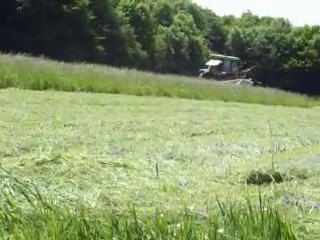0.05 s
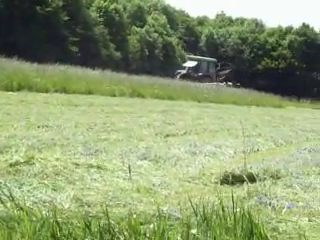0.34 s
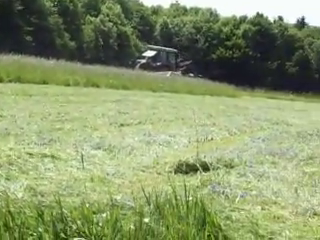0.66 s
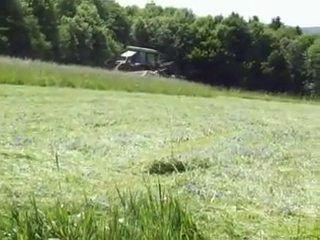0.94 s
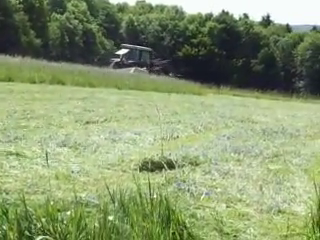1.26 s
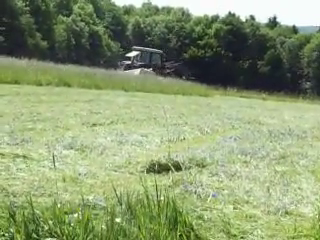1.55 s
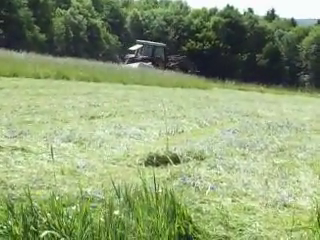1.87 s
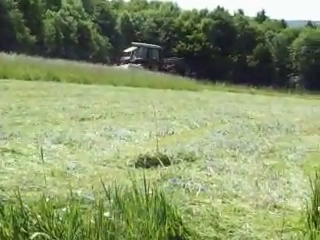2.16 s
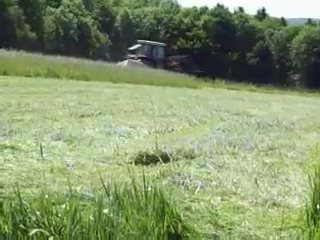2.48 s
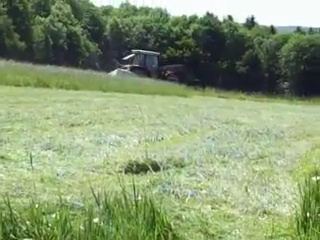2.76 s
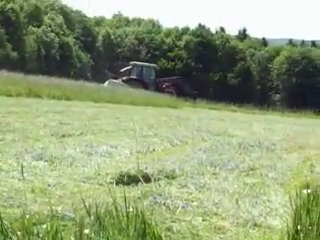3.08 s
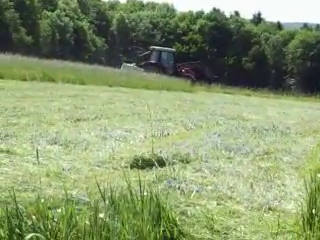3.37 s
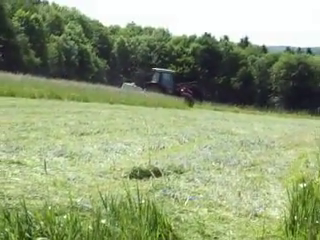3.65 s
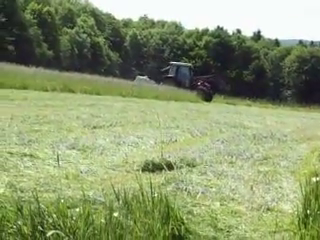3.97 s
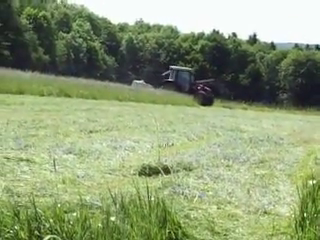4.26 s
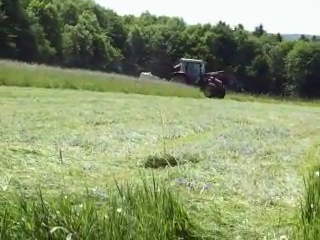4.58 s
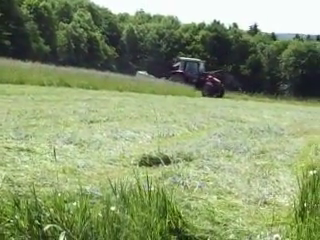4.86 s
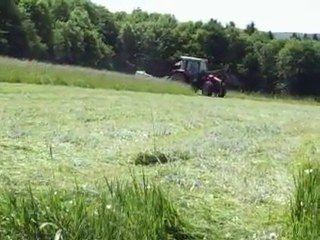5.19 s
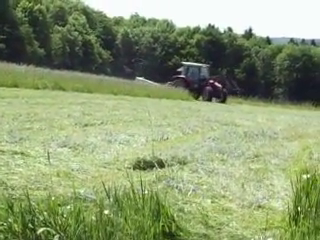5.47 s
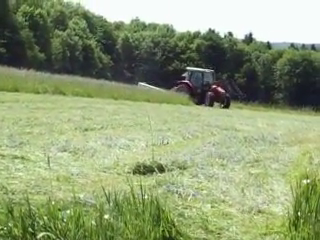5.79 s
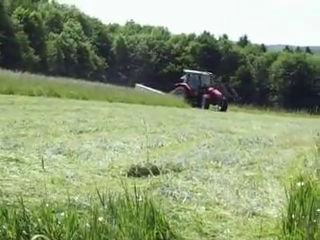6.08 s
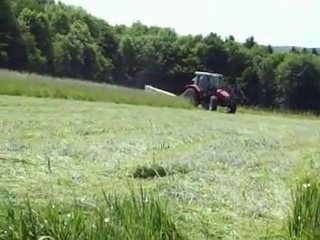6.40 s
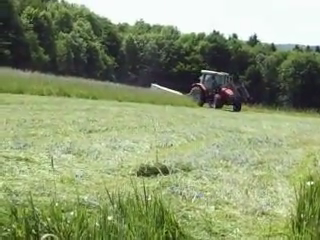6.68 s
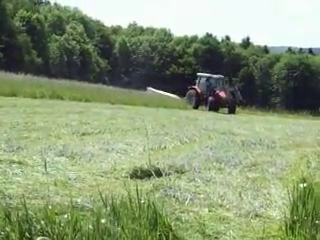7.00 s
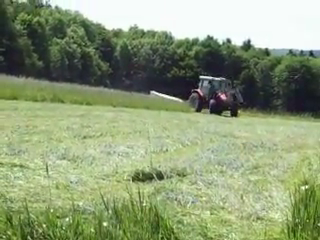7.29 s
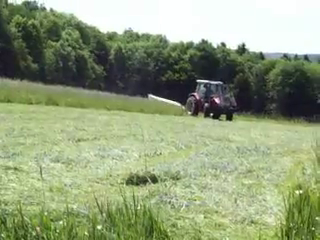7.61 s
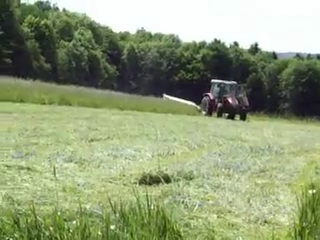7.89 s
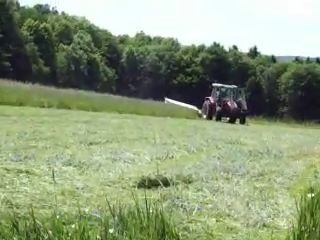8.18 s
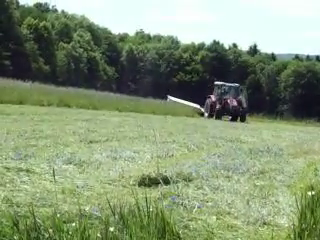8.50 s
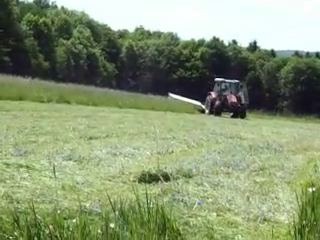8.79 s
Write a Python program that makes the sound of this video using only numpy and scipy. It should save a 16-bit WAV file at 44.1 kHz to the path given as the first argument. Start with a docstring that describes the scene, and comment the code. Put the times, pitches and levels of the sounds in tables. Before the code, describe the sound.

A distant tractor drones across an open field for the whole nine seconds, a low, throbbing engine rumble mixed with a mower's rattle and grassy hiss. The engine pitch sags slightly around 1 second and slowly recovers. Two crickets chirp high and fast throughout, the nearer in bouts, the fainter without pause. A brief, soft scuff sounds close by at 1.2 seconds, and a faint bird note at 1.5. Sharp ticks hit the microphone at 2.7 and 3.4 seconds, the second the loudest, with a smaller one just after. From about 4 seconds the exhaust tone and blade hum strengthen, the hum clearest from 6.7 on. Between 5.4 and 8.4 seconds a small bird gives scattered short, thin whistles, with faint dry crackles nearby. Light ticks fall at about 5.9, 6.3 and 6.9 seconds. The drone continues to the end.

```python
"""Mowing a hay meadow

A distant tractor pulls a mower: periodic firing gives the exhaust drone, rotating blades a hum,
and sheared grass a broadband hiss. Two crickets stridulate close by and a small bird whistles.
A scuff, faint crackles and a few sharp ticks sound at the microphone; the loudest tick makes
the gain control duck."""
import sys
import numpy as np
from scipy import signal
from scipy.fft import rfft, irfft, next_fast_len
from scipy.io import wavfile
from scipy.ndimage import uniform_filter1d, map_coordinates

SR = 44100
rng = np.random.default_rng(int(sys.argv[2]) if len(sys.argv) > 2 else 0)


def store_wav(level_fs):
    """Save 16-bit WAV to argv[1]."""
    pcm = np.round(np.clip(np.atleast_2d(level_fs), -1, 1) * 32767)
    wavfile.write(sys.argv[1], SR, pcm.T.astype(np.int16))


N = 390285
TIME = np.arange(N) / SR

# firing rate, which sags in thick grass and slowly recovers: t/s, f/Hz
FIRING_RATE = [(0, 76.9), (.38, 78.2), (.8, 73), (1.05, 74.8), (1.85, 73.53), (3, 73.84), (4.35, 76.1),
               (5.45, 76.7), (6.25, 77.5), (6.7, 76.88), (7.1, 78.2), (7.7, 77), (8.2, 77.75),
               (8.85, 78.15)]
# exhaust fundamental, growing as the tractor clears the rise: t/s, level/dB
EXHAUST_FIRST = [(0, -49.5), (1.7, -50.5), (3.1, -56), (4.4, -46.5), (6.5, -41), (7.3, -41.5), (8.2, -47),
                 (8.85, -44.5)]
# two strong exhaust harmonics that swell and fade as the tractor moves: t/s, relative level/dB
EXHAUST_SECOND = [(0.0, -27.5), (0.34, -23.5), (0.74, -33.5), (1.01, -29), (2.17, -35), (2.69, -31),
                  (3.6, -47.5), (3.67, -42), (4.8, -30), (5.99, -43), (6.36, -29), (8.4, -30.5),
                  (8.73, -24.5), (8.85, -25.5)]
EXHAUST_FOURTH = [(0.0, -32), (0.37, -39.5), (0.57, -30.5), (4.46, -30.5), (5.49, -36), (5.79, -47.5),
                  (6.43, -33.5), (6.73, -47.5), (6.9, -33.5), (7.49, -28), (8.83, -23.5), (8.85, -25)]
# engine body throb: crank order, level at cruise/dB, slope with firing rate/(dB/Hz)
BODY_ORDERS = [(2, -41, 1.5), (4, -46, 2.2)]
# faint mower whine, locked to the crank: crank order, relative level/dB
WHINE_ORDERS = [(2.5, -55), (5.5, -49), (7, -48), (15, -55), (18, -58), (24, -57), (33, -54), (39, -54),
                (42, -56), (45, -51), (48, -51), (54, -55), (66, -57)]
# how hard the mower works in the grass: t/s, relative level/dB
MOWER_LOAD = [(0.0, -36.5), (0.22, -35.5), (0.69, -39), (1.18, -36.5), (1.55, -37.5), (1.85, -36),
              (3.15, -35.5), (3.38, -36), (4.04, -36), (5.89, -35.5), (7.42, -36), (8.85, -36.5)]
# blade hum, coming through as the mower clears the tall grass: t/s, level/dB
HUM_LEVEL = [(0, -46.5), (3.7, -46), (4.2, -38), (5.4, -37.5), (5.8, -44.5), (6.7, -31.5), (8.85, -33.5)]
# noise spectra: f/Hz, relative spectral density/dB
RUMBLE_SPECTRUM = [(20, -25.5), (45, -17.5), (90, -10.5), (125, -3.5), (175, -0.5), (250, -3), (330, -9.5),
                   (430, -15), (520, -23.5), (900, -58.5)]
CLATTER_SPECTRUM = [(250, -34), (400, -9), (510, -10), (630, -2), (740, -1.5), (810, 2.5), (900, -1),
                    (1250, -5.5), (1420, -5), (1540, -12), (2200, -28.5)]
CUTTING_SPECTRUM = [(900, -34), (1450, -7.5), (1700, -2), (1930, 1), (2130, -2), (2230, -5), (2420, -2.5),
                    (2650, -12.5), (3500, -32)]
HISS_SPECTRUM = [(1800, -27), (2650, -7.5), (2850, -1), (3100, -2), (3350, 2.5), (3600, -1), (3950, 2.5),
                 (4450, 0.6), (5200, -6.5), (5700, -9)]
CRACKLE_SPECTRUM = [(1500, -22), (2800, -2.5), (3600, -1.5), (4400, -4), (5500, -16.5)]
SCUFF_SPECTRUM = [(800, -20), (1400, 2.5), (2200, 0), (2800, -12), (4400, -5), (5500, -29)]
# song bouts of the near cricket: first chirp t/s, last chirp t/s, relative level/dB
CRICKET_BOUTS = [(0.036, 0.397, -35), (0.808, 2.685, -34.5), (3.038, 3.199, -39), (3.539, 4.255, -39),
                 (4.629, 5.124, -34.5), (5.585, 7.739, -35), (8.095, 8.728, -35.5)]
# bird notes: t/s, duration/s, start f/Hz, middle f/Hz, end f/Hz, relative level/dB
BIRD_NOTES = [(1.53, 0.089, 2516, 2448, 2402, -40), (5.387, 0.098, 3720, 3606, 3540, -34),
              (5.727, 0.087, 3020, 2950, 2860, -38.5), (6.041, 0.1, 3285, 3833, 3930, -29.5),
              (6.464, .07, 2750, 2615, 2740, -42), (6.634, 0.085, 4200, 3960, 3350, -30),
              (7.42, 0.039, 3600, 3680, 4120, -36), (7.75, 0.033, 2820, 2875, 2980, -39.5),
              (8.409, 0.025, 3530, 3700, 3695, -38)]
# taps on the microphone's casing: t/s, relative level/dB, T60/s, brightest f/Hz, low bump level/dB
TAPS = [(2.6688, -10.5, .01, 4300, -29), (3.3601, -4.5, .0075, 3200, -18), (3.517, -14.5, .008, 2200, -60),
        (5.89, -25, .008, 4000, -70), (6.271, -23, .008, 3800, -70), (6.936, -19, .008, 2600, -70)]
# modes of the casing: f/Hz, relative level/dB, T60 as a fraction of the tap's
CASING_MODES = [(1420, 1, 0.44), (2750, 1, 0.17), (3680, 0, 0.55), (4000, -7, 0.64), (4480, -0.5, 0.71)]


def engine(crank):
    """Periodic excitation: exhaust harmonics, over a throb and rumble that grow with speed."""
    firing = 3 * crank  # six cylinders fire three times a turn
    over_hz = curve(FIRING_RATE) - 77  # firing rate above cruise
    third_db = -36.5 - 10 * ramp(7.5, 9.4)  # fades as the tractor turns to face the listener
    levels = [curve(EXHAUST_FIRST), curve(EXHAUST_SECOND) - .5, third_db, curve(EXHAUST_FOURTH) - .2]
    exhaust = sum(amp(db) * tone(k * firing, flutter_db=1, drift_rad=.05)
                  for k, db in enumerate(levels, 1))
    throb = sum(amp(db + slope * over_hz) * tone(k * crank, flutter_db=1, drift_rad=.05)
                for k, db, slope in BODY_ORDERS)
    # the higher a tone, the more the moving air smears it
    whine = sum(amp(db - 2) * tone(k * crank, flutter_db=3.5 + .04 * k, drift_rad=.009 * k)
                for k, db in WHINE_ORDERS)
    rumble = amp(-35 + .53 * over_hz) * rush(RUMBLE_SPECTRUM, patchy_db=1.3)
    return exhaust + throb + whine + rumble


def mower(crank):
    """Fixed gear ratios lock the tones to the crank; rattle and shearing noise grow with load."""
    blades, drive, gears = 8.35 * crank, 18.5 * crank, 76.5 * crank
    load_db = curve(MOWER_LOAD) - curve(MOWER_LOAD).mean()
    load_db += .51 * wobble(14)  # uneven grass jolts the whole bar at once
    cutting_db = -42 + .98 * load_db - 2.5 * ramp(5.6, 7.8)  # the turning tractor hides the mower
    fundamental = tone(blades, flutter_db=.6, drift_rad=.1)
    octave = amp(-19.5) * tone(2 * blades, flutter_db=1.5, drift_rad=.3)
    hum = amp(curve(HUM_LEVEL)) * (fundamental + octave)
    gearing = amp(-55.5) * tone(drive, flutter_db=4, drift_rad=.22)
    gearing += amp(cutting_db - 13.5) * tone(gears, flutter_db=3.5, drift_rad=1.5)
    clatter = amp(-37.5 + .8 * load_db) * rush(CLATTER_SPECTRUM, patchy_db=1.47)
    cutting = amp(cutting_db) * rush(CUTTING_SPECTRUM, patchy_db=1.65)
    hiss = amp(-37.5 + 1.6 * load_db) * rush(HISS_SPECTRUM, patchy_db=1.35)
    return hum + gearing + clatter + cutting + hiss


def crickets():
    """Pulse trains: a near cricket sings in bouts, a fainter, higher one without rests."""
    near_chirps = [(s, db) for first, last, db in CRICKET_BOUTS for s in bout(first, last)]
    far_chirps = [(s + rng.normal(0, .03), -42) for s in np.arange(0, N / SR, .203)]
    near = cricket(near_chirps, strokes=2, spacing_s=.0305, length_s=.021, pitch_hz=4852, sag=.045)
    far = cricket(far_chirps, strokes=3, spacing_s=.031, length_s=.022, pitch_hz=4993, sag=.029)
    return amp(.15) * scattered(near, t60=.047, wet_db=-11.5) + far


def cricket(chirps, strokes, spacing_s, length_s, pitch_hz, sag):
    """Stridulation: each wing stroke scrapes a toothed file, and the pitch sags as the wing slows."""
    track = np.zeros(N)
    for s, db in chirps:
        for stroke in range(strokes):
            late, sharp, loud, bend = rng.standard_normal(4)
            slowing = sag * np.exp(.43 * bend)
            glide = pitch_hz * (1 + .0068 * sharp) * np.array([1 + slowing / 3, 1, 1 - slowing])
            onset = s + stroke * spacing_s + .00078 * late - length_s / 2
            add(track, onset, amp(db + loud) * whistle(length_s, glide))
    return track * (1 + .3 * wobble(400))  # the teeth catch unevenly


def bout(first, last, nominal_period_s=.176, hurry=.25, settle_chirps=1.5):
    """Exponential relaxation: chirp times start hurried and settle to an even pace."""
    k = np.arange(round((last - first) / nominal_period_s) + 1)
    paced = k - hurry * settle_chirps * (1 - np.exp(-k / settle_chirps))
    return first + (last - first) * paced / paced[-1]


def bird():
    """Frequency modulation: thin slurred notes from the edge of the wood."""
    track = np.zeros(N)
    for s, length_s, *pitches, db in BIRD_NOTES:
        add(track, s, amp(db - 5) * whistle(length_s, pitches))
    return scattered(track * (1 + .3 * wobble(200)), t60=.15, wet_db=-3)


def ticks():
    """Impact excitation: hard taps ring the casing's damped modes and push the microphone off centre."""
    track, t = np.zeros(N), np.arange(SR // 2) / SR
    for s, db, t60, centre_hz, bump_db in TAPS:
        ring = np.zeros(len(t))
        for hz, level, life in CASING_MODES:
            mode_db = level + rng.normal(0, 1) - 5.9 * np.log2(hz / centre_hz) ** 2
            ring += amp(mode_db - 60 * t / (t60 * life)) * np.sin(2 * np.pi * hz * t)
        crack = .15 * amp(-60 * t / t60) * rng.standard_normal(len(t))
        bump = amp(bump_db) * (1 - np.exp(-t / .001)) * np.exp(-t / .07)
        add(track, s, amp(db) * (crack - ring) - bump)
    return track


def scuff():
    """Friction noise: one brief scuff close by, under a Gaussian envelope."""
    swell = amp(-30.5) * np.exp(-((TIME - 1.177) / .016) ** 2)
    return swell * rush(SCUFF_SPECTRUM, patchy_db=1.5)


def crackles(first_s=5.6, last_s=8.5, per_second=6, t60=.03):
    """Exponentially decaying noise bursts at random moments make faint dry rustles nearby."""
    envelope, t = np.zeros(N), np.arange(SR // 10) / SR
    for _ in range(round((last_s - first_s) * per_second)):
        add(envelope, rng.uniform(first_s, last_s), amp(-35 + rng.normal(0, 2) - 60 * t / t60))
    return envelope * rush(CRACKLE_SPECTRUM, patchy_db=3.5)


def scattered(x, t60, wet_db):
    """Scattering: grass and trees add a short diffuse tail to the direct sound."""
    t = np.arange(SR // 3) / SR
    tail = rng.standard_normal(len(t)) * amp(-60 * t / t60)
    return x + amp(wet_db) * signal.fftconvolve(x, tail / np.linalg.norm(tail))[:N]


def tone(angle, flutter_db, drift_rad):
    """Random amplitude and phase modulation: a tone of rms 1 flutters on its way over the field."""
    phase = angle + rng.uniform(0, 2 * np.pi) + drift_rad * wobble(7)
    return unit(amp(flutter_db * wobble(9)) * np.sin(phase))


def rush(spectrum, patchy_db):
    """Selective fading: coloured noise of rms 1, with drifting patches of gain as the air moves."""
    bins = signal.stft(rng.standard_normal(N), nperseg=1024)[2]
    patches = uniform_filter1d(rng.standard_normal(bins.shape), size=4, axis=0)
    patches = uniform_filter1d(patches, size=30, axis=1)
    noise = signal.istft(bins * amp(patchy_db * unit(patches)), nperseg=1024)[1][:N]
    hz, db = np.transpose(spectrum)
    return unit(filtered(noise, lambda f: amp(np.interp(np.log(f + 1), np.log(hz), db))))


def whistle(length_s, pitches):
    """A sine glides through three pitches under a half-sine envelope."""
    u = np.linspace(0, 1, int(length_s * SR))
    hz = np.polyval(np.polyfit([0, .5, 1], pitches, 2), u)
    return np.sqrt(2) * np.sin(np.pi * u) * np.sin(2 * np.pi * np.cumsum(hz) / SR)


def wobble(rate):
    """A smooth random curve, rate knots a second."""
    return map_coordinates(rng.standard_normal(int(N * rate / SR) + 4), [TIME * rate])


def filtered(x, response):
    """Linear filtering: the spectrum of x times a frequency response."""
    size = next_fast_len(N + 8192)
    return irfft(rfft(x, size) * response(np.fft.rfftfreq(size, 1 / SR)), size)[:N]


def add(track, s, sound):
    """Superpose a sound on the track at time s."""
    start = max(0, round(s * SR))
    track[start:start + len(sound)] += sound[:max(0, N - start)]


def curve(rows):
    """Linear interpolation of (t/s, value) points at every sample."""
    return np.interp(TIME, *np.transpose(rows))


def ramp(start_s, end_s):
    """A linear rise from 0 to 1."""
    return np.interp(TIME, (start_s, end_s), [0, 1])


def amp(db):
    """Decibels to amplitude ratio."""
    return 10 ** (np.asarray(db) / 20)


def unit(x):
    """Normalisation to rms 1."""
    return x / np.sqrt(np.mean(x ** 2) + 1e-20)


def scene():
    """Superposition of all sources; one crank angle drives both engine and mower."""
    crank = 2 * np.pi * np.cumsum(curve(FIRING_RATE)) / (3 * SR)
    return (engine(crank) + mower(crank) + crickets() + bird() + ticks() + scuff() + crackles())[None]


def gain_control(x, ceiling_db, release_s):
    """Peak limiting: the gain drops just after a peak over the ceiling, then creeps back."""
    over_db = np.maximum(20 * np.log10(np.abs(x) + 1e-9) - ceiling_db, 0)
    fade = np.exp(-TIME / release_s)
    held_db = np.maximum.accumulate(over_db / fade) * fade
    return x * amp(-signal.lfilter(np.ones(128) / 128, 1, held_db))  # 3 ms attack


def record(dry):
    """Limiting, soft saturation and low-pass filtering: peaks duck and round off, the treble is cut."""
    ducked = gain_control(dry[0], ceiling_db=0, release_s=.11)
    rounded = ducked / (1 + (ducked / .65) ** 4) ** (1 / 4)
    rolled = filtered(rounded, lambda hz: 1 / np.sqrt(1 + (hz / 5450) ** 32))
    return filtered(rolled, lambda hz: hz < 6132)[None]


dry = scene()
out = record(dry)
store_wav(out)
```